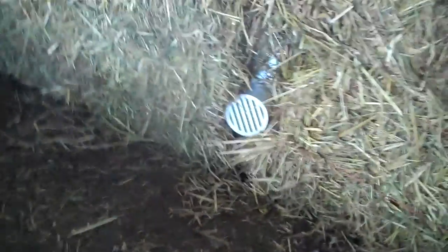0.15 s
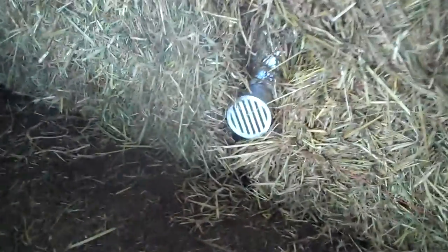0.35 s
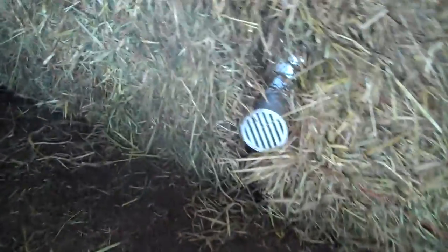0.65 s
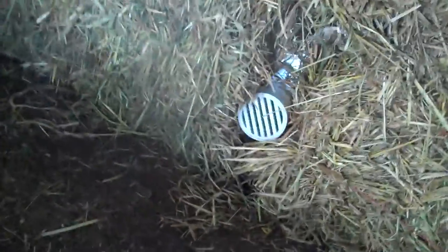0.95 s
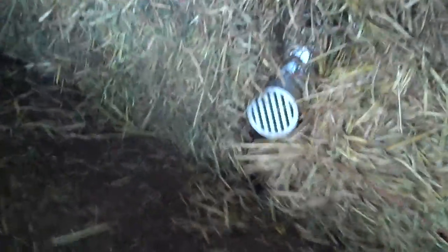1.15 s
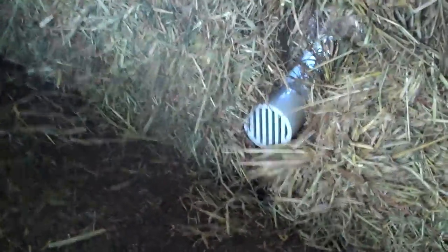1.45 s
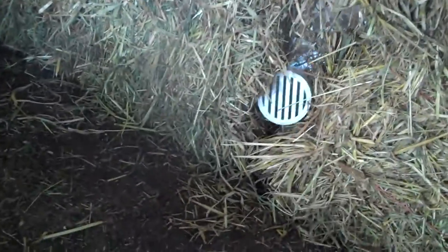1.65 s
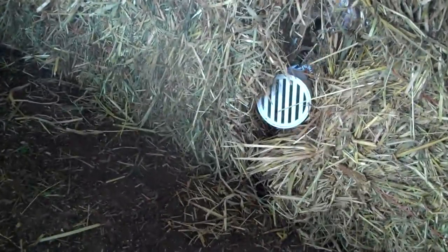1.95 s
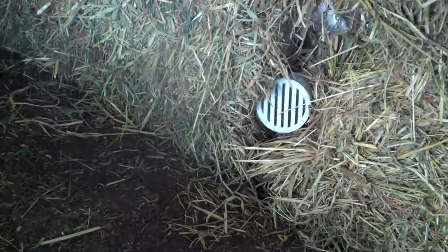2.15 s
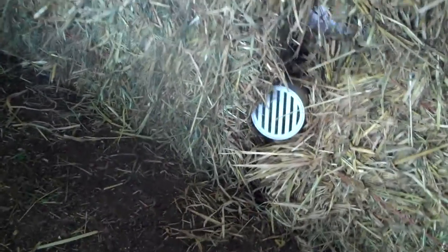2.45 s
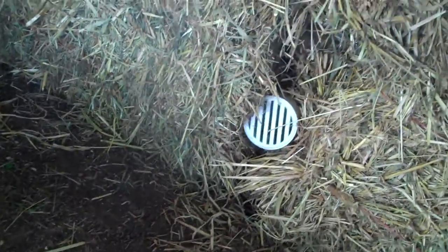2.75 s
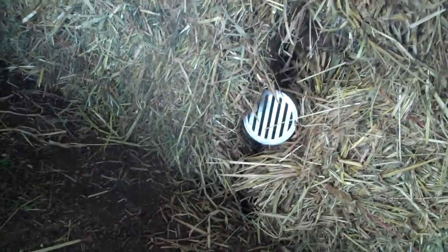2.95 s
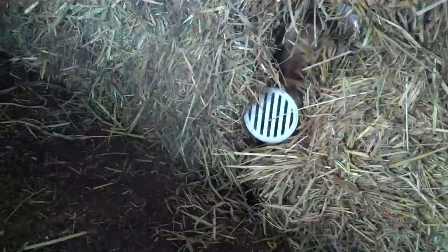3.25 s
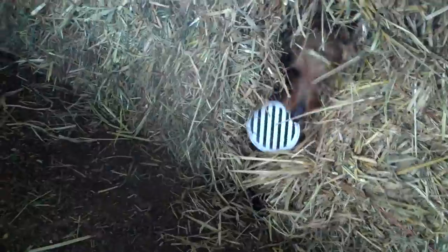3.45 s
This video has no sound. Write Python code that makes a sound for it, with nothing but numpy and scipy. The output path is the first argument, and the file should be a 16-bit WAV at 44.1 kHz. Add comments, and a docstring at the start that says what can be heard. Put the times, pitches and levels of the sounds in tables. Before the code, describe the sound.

Dry straw rustles close up in a quiet barn, with fine crackles and light snaps in the first half second, then sparser stirring. A faint far bird chirps at 0.9 and 1.25 s. A clear snap comes at 1.6 s, denser crackling and a brief falling scrape from 2.1 s, then the loudest cracks at 2.85 and 3.1-3.2 s, and more at 3.45 s. Low air murmur and soft microphone bumps lie beneath.

```python
"""In a quiet barn, a small animal pushes through loose dry straw among bales, close to a hand-held stereo microphone.
Stalks slide and crackle in swells (smooth noise plus ringing ticks), and single stalks snap (short noise bursts).
Small grainy sounds, mostly dull scuffs, are noise in single peaks; a dragged stalk is a noise band sinking in pitch.
A far bird chirps twice with gliding sine tones. The barn air murmurs and hums below in filtered noise,
with a short faint hiss, and the hand bumps the microphone housing softly, each bump a brief low sine push."""
import sys
import numpy as np
from scipy import signal
from scipy.fft import rfft, irfft, next_fast_len
from scipy.io import wavfile

SR = 44100
rng = np.random.default_rng(int(sys.argv[2]) if len(sys.argv) > 2 else 0)


def dump_mix(stems):
    """Bounce the given channels to the path in sys.argv[1] as a 16-bit WAV at rate SR."""
    frames = np.atleast_2d(stems).T  # one column per channel
    limited = np.clip(frames, -1, 1)  # hard clip at full scale
    pcm = np.round(limited * 32767).astype(np.int16)
    wavfile.write(sys.argv[1], SR, pcm)


N = 158760

# tone colour of straw, through the microphone ports: (frequency [Hz], relative level [dB])
STRAW_COLOUR = [(300, -24), (1800, -18.5), (3000, -11.5), (5000, -5), (5800, 0.5), (7400, -2), (8300, -8.5),
                (9800, -15.5), (14200, -18.5)]


def amp(db):
    """Turn decibels into a factor that multiplies the wave."""
    return 10 ** (np.asarray(db) / 20)


def rms_one(x):
    """Scale a signal so that its average strength (rms) is 1."""
    return x / np.sqrt(np.mean(x ** 2) + 1e-20)


def in_time(rows):
    """Read a (time, value) table at every sample, with straight lines between its points."""
    return np.interp(np.arange(N) / SR, *np.transpose(rows))


def at_hz(points, hz, axis=1):
    """Read one column of a table at the given frequencies, on a logarithmic frequency scale."""
    points = np.array(points)
    return np.interp(np.log(hz + 1), np.log(points[:, 0]), points[:, axis])


def drift(rate_hz):
    """Slow random wandering of rms 1: noise smoothed twice, so that little above the rate is left."""
    # computed at every 20th sample; the first 3000 values are dropped while the filter fills up
    r = np.exp(-40 * np.pi * rate_hz / SR)
    slow = signal.lfilter([1], [1, -2 * r, r * r], rng.standard_normal(N // 20 + 3002))[3000:]
    return np.interp(np.arange(N) / 20, np.arange(len(slow)), rms_one(slow))


def resonance(x, hz, width_hz):
    """Let something ring at one pitch: a two-pole peak, scaled so that white noise keeps its rms."""
    r = np.exp(-np.pi * width_hz / SR)
    gain = np.sqrt((1 - r * r) / 2)
    poles = [1, -2 * r * np.cos(2 * np.pi * hz / SR), r * r]
    return signal.lfilter(gain * np.array([1, 0, -1]), poles, x)


def colour(x, spectrum):
    """Filter with the given spectrum, never sounding ahead of its input; white noise keeps its rms."""
    # folding the cepstrum (the log spectrum turned into time) puts the response at its earliest
    cepstrum = irfft(np.log(amp(at_hz(spectrum, np.linspace(0, SR / 2, 4097)))))
    cepstrum[1:4096] *= 2
    cepstrum[4097:] = 0
    taps = irfft(np.exp(rfft(cepstrum)))[:4096]
    taps = taps / np.sqrt(np.sum(taps ** 2))
    return signal.fftconvolve(x, taps[None], axes=1)[:, :N]


def envelope(start_s, rise_s, hold_s, t60_s):
    """Rise from the start, begin an exponential fall after hold_s, drop 60 dB in each t60_s."""
    t = np.arange(N) / SR - start_s
    fall_s = np.clip(t - hold_s, 0, 2 * t60_s)
    return np.clip(t / rise_s, 0, 1) * amp(-60 * fall_s / t60_s)


def pan(db):
    """Left and right gains that differ by the given dB."""
    return amp([[db / 2], [-db / 2]])


def rustle():
    """Countless stalks slide and tick; ticks clump, thicken with vigour and ring stalks of many sizes."""
    # vigour of the stirring: (time [s], level [dB])
    stirring = [(0.0, -32.5), (0.09, -31), (0.154, -39.5), (0.449, -48), (0.678, -43.5), (0.74, -46.5),
                (0.822, -52), (0.845, -40), (0.936, -44), (1.086, -42), (1.229, -43.5), (1.353, -52),
                (1.421, -55.5), (1.542, -34), (1.624, -46), (1.774, -36.5), (1.85, -45.5), (2.073, -48),
                (2.103, -36.5), (2.149, -31.5), (2.187, -42.5), (2.25, -40), (2.27, -30), (2.347, -43),
                (2.417, -35.5), (2.512, -40.5), (2.562, -32), (2.616, -40), (2.726, -43.5), (2.768, -29),
                (2.861, -31), (2.999, -42.5), (3.456, -33), (3.6, -35.5)]
    ticks_per_s, clump_db = 2300, 2.12  # ticks at average vigour, before clumping
    tick_db, slide_db = -6.5, -4  # shares of crackle and of smooth sliding in the rustle
    tick_spread_db, stalk_patch_db, slide_patch_db = 2, 4, 1.5

    vigour = in_time(stirring)
    rate = ticks_per_s * amp(0.4 * (vigour - vigour.mean()) + clump_db * drift(27))

    # three streams of ticks: same vigour and clumps, each with its own random ticks
    sizes = amp(tick_spread_db * np.minimum(rng.exponential(1, (3, N)), 4))
    sizes = sizes * rng.choice([-1, 1], (3, N))
    happens = rng.random((3, N)) < rate / SR
    ticks = sizes * happens / np.sqrt(rate / rate.mean())  # more ticks alone do not mean louder

    # each tick rings one of 12 sizes of stalk; each size comes and goes on its own
    stalks_hz = np.geomspace(1500, 9500, 12)
    dealt = rng.integers(0, 12, (3, N))
    rung = 0
    for k, hz in enumerate(stalks_hz):
        ringing = resonance(ticks * (dealt == k) + 1e-18, hz, 0.17 * hz)
        rung = rung + np.sqrt(hz) * amp(stalk_patch_db * drift(14.3)) * ringing

    slide = rng.standard_normal((3, N)) * amp(slide_patch_db * drift(14))
    mix = amp(tick_db) * rms_one(rung) + amp(slide_db) * slide
    return colour(amp(vigour) * mix, STRAW_COLOUR)


def air():
    """Filtered noise as barn air: a broad murmur, a low hum and a passing narrow hiss."""
    # murmur of the air: (time [s], level [dB])
    murmur_level = [(0, -52.5), (.7, -51.5), (.78, -55.5), (.88, -48.5), (1.15, -50.5), (1.32, -56.5),
                    (1.7, -52), (2.05, -55.5), (2.7, -56.5), (3.0, -53),]
    # tone colour of the murmur: (frequency [Hz], relative level [dB])
    murmur_colour = [(25, -2.5), (170, -9), (350, -0.5), (700, 1.5), (1600, -1.5), (3000, -5.5), (6000, -8),
                     (14000, -19)]
    # span of the faint hiss: (start [s], end [s])
    start, end = 1.58, 2.08
    # sound of the faint hiss: (centre [Hz], width [Hz], level [dB])
    hiss_hz, hiss_width_hz, hiss_db = (3870, 200, -55)
    hum_hz, hum_width_hz, hum_db = 92.8, 9, -67

    white = rng.standard_normal((3, 3, N))
    murmur = amp(in_time(murmur_level) + 2.0 * drift(3.1)) * colour(white[0], murmur_colour)
    hiss = resonance(white[1], hiss_hz, hiss_width_hz)
    hiss = amp(hiss_db) * envelope(start, 0.039, end - start, 0.14) * hiss
    hum = amp(hum_db) * resonance(white[2], hum_hz, hum_width_hz)
    return murmur + hiss + hum


def bumps():
    """Soft bumps of the hand on the housing: about one cycle of low push each."""
    # bumps: (time [s], level [dB], pitch [Hz], left-right difference [dB])
    hand_bumps = [(0.109, -47, 62.4, 10), (0.357, -52, 77, -18), (0.599, -53, 60.4, -6),
                  (0.745, -53, 54.7, -6), (0.871, -54.5, 81.5, -27), (2.811, -52, 86, -17),
                  (3.226, -52, 65.4, -17)]
    t = np.arange(N) / SR
    out = 0
    for s, db, hz, side_db in hand_bumps:
        swell = np.exp(-((t - s - 0.62 / hz) * hz * 2.1) ** 2)
        out = out + amp(db) * pan(side_db) * swell * np.sin(2 * np.pi * hz * (t - s))
    return out


def snaps():
    """A crack, tearing fibres that ring the stalk and spiky settling start together; settling fades last."""
    # stalks that snap: (time [s], level [dB], pitch of the stalk [Hz], length of the break [ms])
    breaks = [(0.1107, -30, 6400, 1.8), (0.2324, -28.5, 7060, 1.1), (0.316, -36.5, 6700, 4.2),
              (0.382, -34, 5900, 1.8), (0.4227, -34.5, 7200, 2.6), (0.4888, -36.5, 7340, 0.34),
              (0.8334, -40, 4870, 1.13), (0.8547, -39, 4000, 2.2), (0.8896, -32.5, 8200, 1.4),
              (0.898, -30.5, 4060, 1.4), (1.0697, -24, 7900, 0.46), (1.5826, -17, 5700, 1.6),
              (2.1227, -27.5, 7000, 1), (2.1374, -23, 7700, 0.62), (2.17, -30.5, 6100, 1.5),
              (2.2564, -20, 7200, 4.3), (2.2685, -24.5, 6700, 1.1), (2.2748, -25, 7100, 1.3),
              (2.284, -26.5, 7760, 1.1), (2.293, -32, 6000, 0.82), (2.6554, -30, 6350, 0.49),
              (2.7717, -21.5, 6470, 2.75), (2.8451, -7, 5060, 1.7), (2.8491, -6.5, 5130, 1.73),
              (2.8662, -23, 5740, 2), (2.904, -25.5, 5730, 2.8), (3.0087, -30.5, 5530, 1),
              (3.0549, -25, 5100, 1.3), (3.0913, -32.5, 5850, 9.3), (3.1198, -18, 7500, 5.8),
              (3.1303, -10.5, 6200, 0.96), (3.1803, -8.5, 5560, 2.93), (3.1872, -13, 5370, 3.3),
              (3.2689, -25, 5500, 5.3), (3.3433, -28.5, 6040, 4.7), (3.4425, -16.5, 5150, 6.7),
              (3.4471, -22.5, 6000, 4.8), (3.5145, -29, 4600, 5.7)]
    rise_ms, tear_t60_s = 0.12, 0.0088
    ring_db, ring_t60_s = 0.5, 0.0011
    settle_db, settle_t60_s = -18, 0.13  # the straw around the snap
    crack_db, crack_db_per_khz, crack_t60_s = -24.5, 8, 0.0011  # thin, high stalks crack brighter
    low_share = 0.25  # a stalk gives little below this share of its pitch

    out = np.zeros((3, N + SR))
    treble = signal.butter(2, 8000, "high", fs=SR, output="sos")
    ring_width_hz = np.log(1000) / np.pi / ring_t60_s  # a wider peak rings shorter
    t = np.arange(int(.12 * SR)) / SR
    for s, db, hz, ms in breaks:
        fibres = rng.standard_normal((3, 3, len(t)))

        # the tear is the same in all three streams
        tear = fibres[0, :1] * np.clip(1000 * t / rise_ms, 0, 1)
        tear = tear * amp(-60 * np.clip(t - ms / 1000, 0, 1) / tear_t60_s)
        tear = colour(tear + amp(ring_db) * resonance(tear, hz, ring_width_hz), STRAW_COLOUR)
        thin = signal.butter(2, low_share * hz, "high", fs=SR, output="sos")
        tear = signal.sosfilt(thin, tear[:, :len(t)])
        # even out the strength during the break, so that the table sets it
        tear = tear / np.sqrt(2 * np.mean(tear[:, t < ms / 1000] ** 2, axis=1, keepdims=True))

        # cubing makes the noise spiky, like small crackles
        settle = rms_one(fibres[1] ** 3) * amp(settle_db - 60 * t / settle_t60_s)
        settle = colour(settle, STRAW_COLOUR)[:, :len(t)]

        crack_level = crack_db + crack_db_per_khz * (hz / 1000 - 4) - 60 * t / crack_t60_s
        crack = signal.sosfilt(treble, fibres[2]) * amp(crack_level)

        first = int(s * SR)
        out[:, first:first + len(t)] += amp(db) * (tear + settle + crack)
    return out[:, :N]


def grainy_sounds():
    """Small sounds of grainy noise, each in one resonance: mostly dull scuffs."""
    # mostly dull scuffs, with a short tick at 2.64 s and a narrow, whistle-like sound at 2.7 s:
    # (time [s], length [s], level [dB], centre [Hz], width [Hz])
    small_sounds = [(0.188, 0.012, -46, 1690, 700), (0.724, 0.004, -43, 3320, 1500),
                    (0.931, 0.01, -44, 800, 900), (0.947, 0.038, -43.5, 960, 870),
                    (2.639, 0.0036, -35, 2880, 600), (2.7, 0.053, -49, 3670, 200),
                    (2.733, 0.047, -40, 2040, 343), (2.775, 0.077, -49, 2480, 600),
                    (2.941, 0.015, -46.5, 597, 890)]
    grain = rng.standard_normal((3, N)) * amp(1.6 * drift(36))
    out = 0
    for s, length, db, hz, width_hz in small_sounds:
        shape = envelope(s, 0.22 * length, length, 1.8 * length)
        out = out + amp(db) * shape * resonance(grain, hz, width_hz)
    return out


def chirps():
    """A far bird: thin whistled tones that glide up a little and linger in the barn."""
    # chirps: (time [s], length [s], pitch [Hz], level [dB], left-right difference [dB])
    calls = [(0.917, 0.031, 4730, -49, -20), (1.242, 0.091, 4620, -48, -16.5)]
    rise_hz = 50  # each starts this much flat
    chirp_t60_s, echo_db, echo_t60_s = 0.04, -7.5, .4
    t = np.arange(N) / SR
    out = 0
    for s, length, hz, db, side_db in calls:
        level = amp(db + 2.0 * drift(30)) * pan(side_db)
        direct = envelope(s, 0.28 * length, length, chirp_t60_s)
        echo = amp(echo_db) * envelope(s, length, length, echo_t60_s)
        pitch = np.interp(t, [s, s + length / 2], [hz - rise_hz, hz]) + 6.4 * drift(60)
        out = out + level * (direct + echo) * np.sin(2 * np.pi * np.cumsum(pitch) / SR)
    return out


def drag():
    """One stalk dragged along the heap: a narrow grainy scrape that swells and slides down in pitch."""
    # span of the drag: (start [s], length [s])
    s, length = 2.18, 0.085
    # sound of the drag: (level [dB], from pitch [Hz], to pitch [Hz], width [Hz])
    db, from_hz, to_hz, width_hz = (-34, 7600, 5998, 500)
    phase = 2 * np.pi * np.cumsum(in_time([(s, from_hz), (s + length, to_hz)])) / SR
    # slow noise times a gliding tone gives a band of noise around that pitch
    smooth = signal.butter(2, width_hz / 2, fs=SR, output="sos")
    wobble = signal.sosfilt(smooth, rng.standard_normal((2, 3, N)))
    scrape = rms_one(wobble[0] * np.cos(phase) + wobble[1] * np.sin(phase))
    return amp(db) * envelope(s, length, length, length / 2) * scrape


def ports(streams):
    """Stream one reaches both microphone ports, the others one each; ports differ in colour and lag."""
    # the two ports: (frequency [Hz], left-right difference [dB], lag of the left [radians],
    # share of power common to both [0-1])
    port_table = [(88, -3, -0.5, 0.67), (250, 1, 0, 0.8), (1020, -0.5, 0.53, 0.95), (4340, -1, 0, 0.59),
                  (4900, -5, 1.5, 0.58), (6200, -4, -0.5, 0.42), (7170, 11, 1.8, 0.56), (11450, 9, 1.5, 1),
                  (14600, 19, 6, 0.7)]
    size = next_fast_len(N + 4096)
    hz = np.arange(size // 2 + 1) * SR / size
    both, left, right = rfft(streams, size)
    share = np.clip(at_hz(port_table, hz, axis=3), 0, 1)
    pair = np.sqrt(share) * both + np.sqrt(1 - share) * np.array([left, right])

    # half of the difference goes to each side, in opposite directions
    lean = amp(at_hz(port_table, hz) / 2) * np.exp(-.5j * at_hz(port_table, hz, axis=2))
    balance = 2 / np.abs(lean + 1 / lean).clip(1, 9)  # holds the sum of both sides steady, within limits
    return irfft(pair * np.array([lean, 1 / lean]) * balance, size)[:, :N]


def scene():
    """Straw and barn air pass through the ports; bird and hand have their own left-right balance."""
    return ports(rustle() + snaps() + drag() + grainy_sounds() + air()) + chirps() + bumps()


def record(dry):
    """The loudest snaps are rounded off, and the top of the treble is cut."""
    clip_top, cutoff_hz = 1, 14250  # 40 dB down from the cutoff upwards
    rounded = clip_top * np.tanh(dry / clip_top)
    return signal.sosfilt(signal.cheby2(14, 40, cutoff_hz, fs=SR, output="sos"), rounded)


dry = scene()
out = record(dry)
dump_mix(out)
```